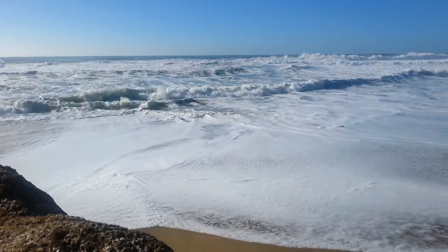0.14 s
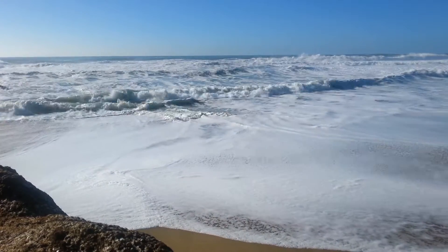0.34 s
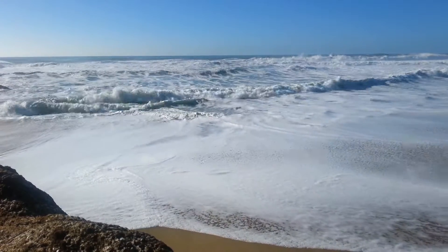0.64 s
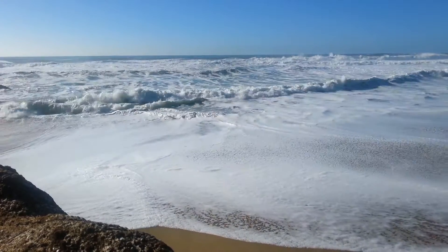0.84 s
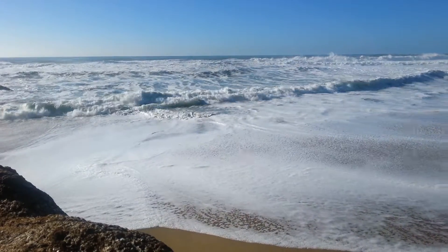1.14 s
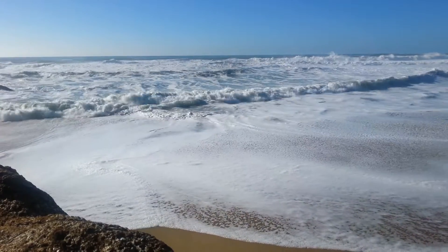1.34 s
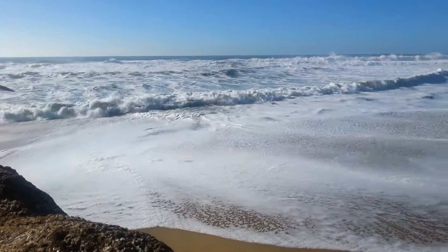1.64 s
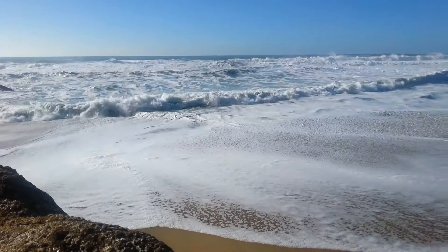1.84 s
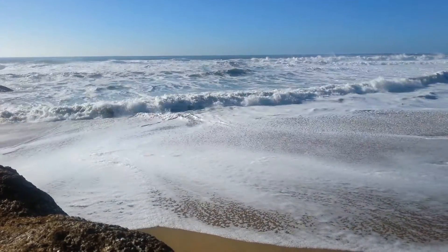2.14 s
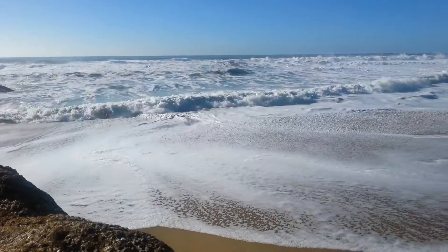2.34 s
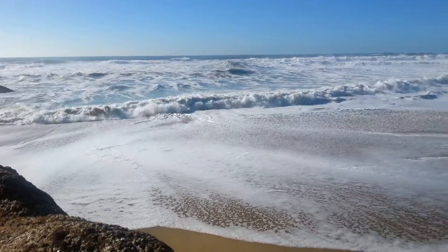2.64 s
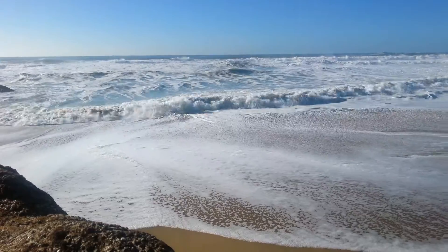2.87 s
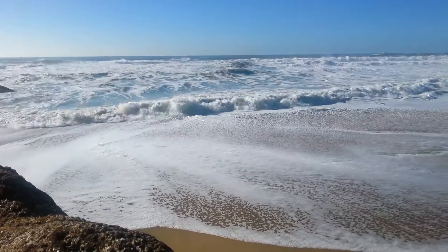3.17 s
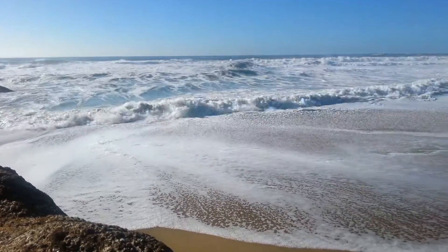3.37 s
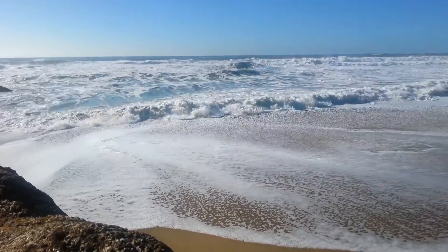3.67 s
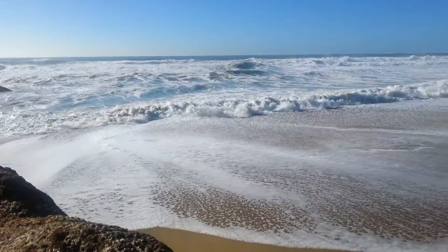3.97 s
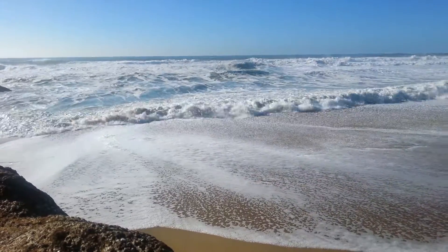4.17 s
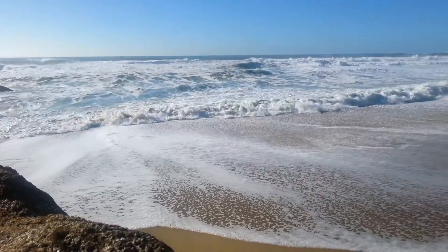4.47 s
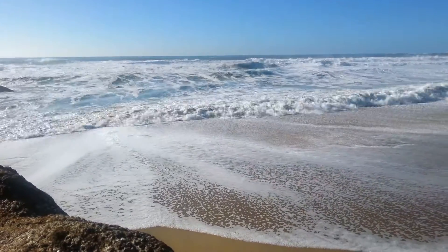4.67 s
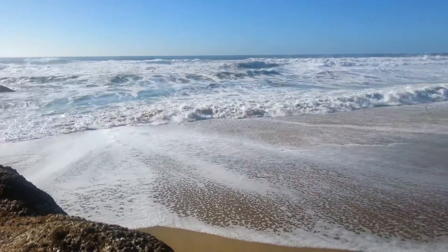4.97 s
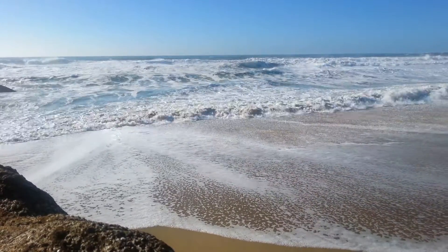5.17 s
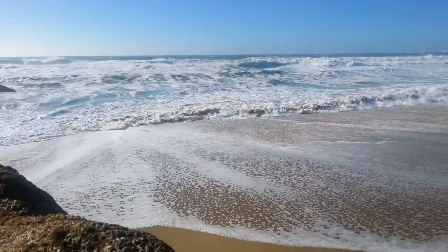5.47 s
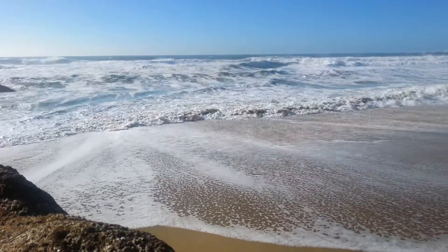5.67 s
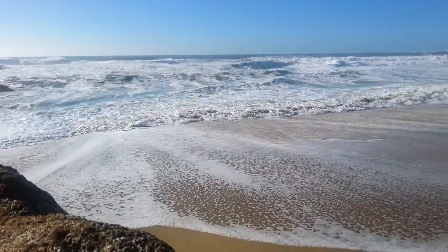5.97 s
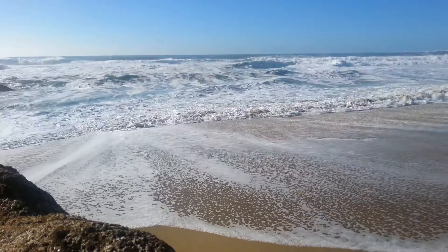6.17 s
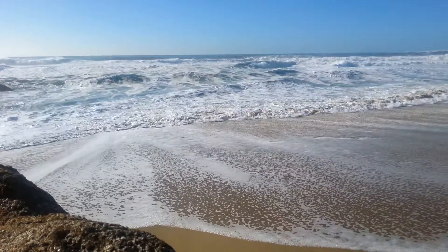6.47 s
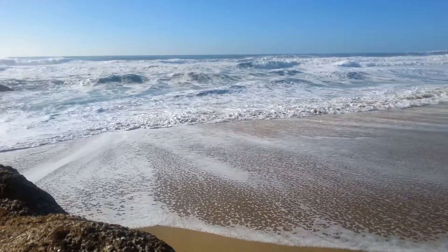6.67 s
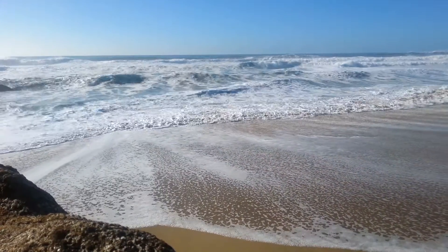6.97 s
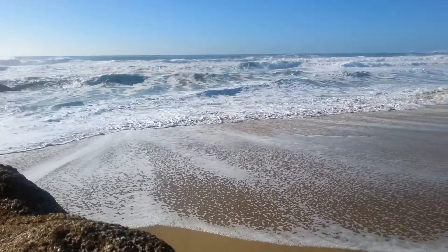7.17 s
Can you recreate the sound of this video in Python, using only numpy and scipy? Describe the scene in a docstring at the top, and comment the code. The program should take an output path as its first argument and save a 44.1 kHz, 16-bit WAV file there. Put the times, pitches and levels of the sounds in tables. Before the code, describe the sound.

On an open sandy beach, surf roars continuously over a deep far rumble, with foam hissing and fizzing up close. Hard wind gusts batter the microphone in the first second and a half, mostly on the right, with thumps and distorted knocks. The wind eases as a wave crashes a little after two seconds, then buffeting returns from about four seconds to near the end.

```python
"""Surf on a sandy beach, in wind

Far breakers rumble and boom, a bore roars in and crashes, foam hisses, seethes and fizzes on the sand:
noise and ringing bubbles, coloured and correlated as the sea is at two microphone ports.
Gusty wind, band-limited noise per port, buffets mostly the right one; the surf gets louder with each
gust and dies away more slowly. Single eddies thump and slaps of air knock one port at a time,
overloading it briefly."""
import sys
import numpy as np
from scipy import signal
from scipy.fft import rfft, irfft, next_fast_len
from scipy.io import wavfile
from scipy.ndimage import uniform_filter1d, map_coordinates

SR = 44100
rng = np.random.default_rng(int(sys.argv[2]) if len(sys.argv) > 2 else 0)


def wav_record(signal):
    """Record a signal, one row per channel, as 16-bit PCM in the file named by sys.argv[1]."""
    frames = np.transpose(np.atleast_2d(signal))
    bounded = np.clip(frames, -1, 1)
    # unit amplitude maps onto the largest positive 16-bit level
    quanta = np.round(bounded * 32767).astype(np.int16)
    wavfile.write(sys.argv[1], SR, quanta)


N = 322791
TOP_HZ = 14700  # band limit of the output and of bubble pitch

# gusts: start t/s, hold/s, buffeting left level/dB, right level/dB (both before port trims),
# level/dB added in power to the surf hiss
GUSTS = [(0.153, 0.035, -17.5, -18, -43.5), (0.308, 0.031, -22, -15, -40), (0.39, 0.074, -18, -17, -56),
         (0.582, 0.082, -28, -20, -43.5), (0.888, 0.075, -23.5, -17, -42.5), (1.028, 0.046, -26, -33, -41),
         (1.12, 0.12, -25, -15.5, -43.5), (1.296, 0.013, -18, -28, -49), (1.415, 0.055, -18, -21, -40.5),
         (2.121, 0.032, -22.5, -19, -43.5), (2.269, 0.026, -25, -23, -40.5),
         (2.343, 0.096, -24, -22.5, -47), (2.525, 0.049, -20.5, -17.5, -43.5),
         (2.918, 0.005, -27, -26, -55), (3.058, 0.061, -27, -24, -65), (3.32, 0.023, -25, -22, -72),
         (3.746, 0.1, -24, -22.5, -42.5), (3.884, 0.041, -21.5, -17.5, -46),
         (3.989, 0.025, -21, -17, -44.5), (4.109, 0.037, -24.5, -17.5, -46), (4.206, 0.11, -25, -26, -55),
         (4.376, 0.055, -24, -22.5, -44), (4.65, 0.015, -23, -20, -43), (4.719, 0.13, -22.5, -17.5, -42.5),
         (4.867, 0.019, -23, -17, -52), (4.95, 0.04, -33, -26, -49), (5.287, 0.13, -23, -21.5, -44.5),
         (5.47, 0.041, -21.5, -16, -46.5), (5.811, 0.056, -23, -26, -44), (5.863, 0.099, -27, -17.5, -47),
         (6.042, 0.05, -21.5, -18.5, -45), (6.338, 0.032, -25.5, -22, -46.5),
         (6.522, 0.017, -19.5, -21.5, -42.5)]


def amp(db):
    """Decibels to gain."""
    return 10 ** (np.asarray(db) / 20)


def unit(x):
    """Scale to rms 1."""
    return x / np.sqrt(np.mean(x ** 2) + 1e-20)


def along(rows, hz):
    """Each column after the frequency, interpolated on a log-frequency axis."""
    f, *cols = np.transpose(rows)
    return np.array([np.interp(np.log(hz + 1), np.log(f + 1), c) for c in cols])


def curves(rows):
    """One value per sample for each column after the time."""
    s, *cols = np.transpose(rows)
    return np.array([np.interp(np.arange(N) / SR, s, c) for c in cols])


def wobble(rate_hz):
    """Smooth random curve with rate_hz knots a second."""
    knots = rng.standard_normal(int(N * rate_hz / SR) + 4)
    return map_coordinates(knots, [np.arange(N) * rate_hz / SR])


def filtered(x, response):
    """x times a complex response of frequency."""
    size = next_fast_len(N + 8192)
    return irfft(rfft(x, size) * response(np.fft.rfftfreq(size, 1 / SR)), size)[..., :N]


def above(hz, edge_hz, order=4):
    """Gain of a high-pass."""
    return 1 / np.sqrt(1 + (edge_hz / (hz + 1)) ** (2 * order))


def below(hz, edge_hz, order=4):
    """Gain of a low-pass."""
    return 1 / np.sqrt(1 + (hz / edge_hz) ** (2 * order))


def steady(x, span_s=0.038):
    """Noise held near rms 1 from moment to moment; its quick grain stays."""
    size = max(int(span_s * SR), 64)
    power = uniform_filter1d(uniform_filter1d(x ** 2, size), size)
    return x / np.sqrt(abs(power) + 1e-20)


def churn(patchy_db):
    """Two unrelated noises whose shared patches of time and frequency swell and fade."""
    z = signal.stft(rng.standard_normal((2, N)), nperseg=512)[2]
    field = uniform_filter1d(rng.standard_normal(z.shape[1:]), size=6, axis=0)
    field = uniform_filter1d(field, size=14, axis=1)
    return unit(signal.istft(z * amp(patchy_db * unit(field)), nperseg=512)[1][:, :N])


def bubbles(centre_hz, cycles, spread_db, count):
    """Small bubbles ring briefly, each at its own pitch, strength and place; cycles = 1/e decay."""
    when, place, size = rng.random((count, 3)).T
    hz = np.minimum(centre_hz * np.exp(.5 * rng.standard_normal(count)), TOP_HZ)
    turns = hz[:, None] * np.arange(160) / SR
    strength = amp(-spread_db * np.log(1 - .995 * size))
    rings = strength[:, None] * np.sin(2 * np.pi * turns) * np.exp(-turns / cycles)
    index = ((when * N).astype(int)[:, None] + np.arange(turns.shape[1])).ravel()
    ports = []
    for share in (place, 1 - place):
        weighted = rings * np.sqrt(share)[:, None]
        ports.append(np.bincount(index, weighted.ravel(), N)[:N])
    return unit(np.array(ports))


def from_sea(pair, low_hz, high_hz):
    """A band of sea sound, coloured and correlated between the ports, its mid at rms 1."""
    # sea colour per port: f/Hz, left density/dB per Hz, right density/dB per Hz (relative)
    colour = [(40, -29, -25), (60, -21, -24), (135, -5.5, -2.5), (235, 1.5, 2), (270, -1.5, -0.5),
              (446, -13.5, -13), (660, -15, -15.5), (1030, -17.5, -13), (1324, -21, -21.5),
              (2070, -25, -24.5), (2350, -20.5, -26), (2970, -30.5, -31), (3720, -26, -30),
              (4700, -33.5, -29), (5250, -32, -33.5), (5500, -36.5, -37), (7200, -42, -33),
              (7840, -42, -33), (10120, -40.5, -38.5), (12200, -49.5, -70), (14100, -61, -60)]
    # likeness of the ports, each part clipped to +-0.95: f/Hz, in-phase/1, quadrature/1
    likeness = [(40, 0.18, 0.7), (123, 0.76, -0.6), (180, 0.89, -0.2), (400, 0.59, 0.091),
                (553, 0.9, -0.55), (700, 0.98, 0.24), (877, -0.35, 1), (1178, -0.1, -1.34),
                (1640, -0.22, 0.31), (2370, 0.61, 0.63), (2830, -0.62, 0.44), (2960, -0.041, -0.013),
                (5840, -0.05, 0.27), (11502, -0.034, -0.073), (14000, 0.45, 0.01)]

    def shared(hz):
        real, quadrature = np.clip(along(likeness, hz), -.95, .95)
        return real + 1j * quadrature

    def own(hz):
        return np.sqrt(np.maximum(1 - abs(shared(hz)) ** 2, 0))

    def band(hz):
        return amp(along(colour, hz)) * above(hz, low_hz) * below(hz, high_hz)

    right = filtered(pair[0], shared) + filtered(pair[1], own)
    ports = filtered(np.array([pair[0], right]), band)
    return ports / np.std(ports.mean(axis=0))


def breakers(wide_db=-28, ahead_db=-31):
    """Far breakers merge into a slowly heaving rumble; those straight ahead reach both ports alike."""
    # slow heave: t/s, level/dB (relative)
    heave = [(0, 1), (1.2, 4.5), (1.9, 2.6), (2.5, 2.5), (3.5, -1.2), (5, 1), (6.3, 0.5), (7.3, 0)]
    wide = from_sea(churn(patchy_db=0.5), low_hz=42, high_hz=606)
    ahead = unit(from_sea(churn(patchy_db=3.5), low_hz=50, high_hz=615)[0])
    return amp(curves(heave)[0]) * (amp(wide_db) * wide + amp(ahead_db) * ahead)


def bore(roar_db, trim_db=3.0):
    """The broken wave tumbles up the beach, full of large bubbles."""
    large = bubbles(centre_hz=1428, cycles=1.8, spread_db=-2.0, count=6000)
    water = churn(patchy_db=0.83) + 0.15 * large
    return amp(roar_db + trim_db) * from_sea(water, low_hz=595, high_hz=2880)


def hollows(x, spacing_hz=720, reach_hz=420):
    """A low hollow creeps up and fades by 3.3 s; another near 900 Hz then deepens; shoulders rise."""
    # hollow in the spectrum: t/s, f/Hz, depth/dB
    notch = [(0, 148, 3), (1.3, 254, 3), (2.0, 317, 4), (2.9, 385, 3), (3.3, 464, 0.4), (3.55, 845, 0.5),
             (4.3, 860, 2.5), (5.0, 865, 3.5), (6.0, 915, 4), (7.32, 930, 4.5)]
    hz, t, z = signal.stft(x, SR, nperseg=1024)
    s, notch_hz, depth_db = np.transpose(notch)
    offset_hz = hz[:, None] - np.interp(t, s, notch_hz)
    ripple = np.cos(2 * np.pi * offset_hz / spacing_hz) * np.exp(-.5 * (offset_hz / reach_hz) ** 2)
    gain = amp(-np.interp(t, s, depth_db) * ripple)
    return signal.istft(z * gain, SR, nperseg=1024)[1][:, :N]


def spread(x, start_s=3.6, length_s=2.8):
    """As the bore fans out along the beach, the widest part of its sound moves up in pitch."""
    # gain of the stereo side signal: f/Hz, bore far level/dB, bore spread out level/dB
    width = [(430, -1.5, -6), (540, 6, 5), (690, 5, 0), (880, -4, -2), (1250, -5, -0.5), (1500, 0.5, 3.5),
             (1750, 1.5, 1.5)]
    mid, side = (x[0] + x[1]) / 2, (x[0] - x[1]) / 2
    far, near = filtered(side, lambda hz: amp(along(width, hz)))
    arrived = np.clip((np.arange(N) / SR - start_s) / length_s, 0, 1)
    side = far + arrived * (near - far)
    return np.array([mid + side, mid - side])


def foam(hiss_db, pan_db):
    """Countless tiny bubbles burst on the sand; the hiss drifts to the left."""
    tiny = bubbles(centre_hz=5200, cycles=0.94, spread_db=1.0, count=12000)
    hiss = churn(patchy_db=1.0) + 0.14 * tiny
    hiss = filtered(hiss, lambda hz: below(hz, 9140, order=10))
    port_db = hiss_db + np.array([pan_db, -pan_db]) / 2
    return amp(port_db) * from_sea(hiss, low_hz=2950, high_hz=13000)


def fizz(fizz_db):
    """The smallest bubbles merge into a fine sizzle above the hiss."""
    noise = rng.standard_normal((2, N))
    sizzle = filtered(noise, lambda hz: above(hz, 11800) * below(hz, 13600, order=8))
    return amp(fizz_db) * from_sea(sizzle, low_hz=9500, high_hz=13000)


def seethe():
    """Thick near foam bursts in bubbles large enough to grain the hiss, until it drains."""
    # near foam: t/s, level/dB
    sheet = [(0, -48), (0.8, -50.5), (1.2, -47), (1.6, -50.5), (2.2, -70), (7.32, -90)]
    pops = bubbles(centre_hz=4100, cycles=2.0, spread_db=3.0, count=9000)
    return amp(curves(sheet)[0]) * from_sea(pops, low_hz=3800, high_hz=4700)


def booms():
    """A big breaker far out falls with a deep, slowly swelling boom."""
    # booms: middle t/s, Gaussian sigma/s, filter f/Hz, peak level/dB
    falls = [(0.1, 0.23, 102, -36.5), (1.17, 0.12, 75, -31.5), (2.446, 0.24, 130, -29.5),
             (5.6, 0.69, 98, -31.5), (7.1, 0.34, 85, -37.5)]
    t = np.arange(N) / SR
    total = np.zeros((2, N))
    for s, sigma_s, tune_hz, db in falls:
        noise = rng.standard_normal((2, N)) + rng.standard_normal(N)
        rumble = filtered(noise, lambda hz: above(hz, 1.2 * tune_hz) * below(hz, tune_hz))
        total += amp(db) * np.exp(-.5 * ((t - s) / sigma_s) ** 2) * unit(rumble)
    return total


def gusting(calm_db, peaks_db, release_s, attack_s=0.02):
    """Level in dB over time: at each gust it rises, holds and dies away, in power above a calm level."""
    t = np.arange(N) / SR
    power = amp(calm_db) ** 2
    for (start, hold, *_), peak_db in zip(GUSTS, peaks_db):
        rise = np.clip((t - start) / attack_s, 0, 1)
        fall = np.exp(-np.maximum(t - start - attack_s - hold, 0) / release_s)
        power = power + (amp(peak_db) * rise * fall) ** 2
    return 10 * np.log10(power)


def wind(strength_db, common, trim_db, lumpy_db, share=0.35, rasp_db=-5.0, rasp_growth=1.42):
    """Turbulence at one port: a low lumpy roar, partly common to both, harsher in strong gusts."""
    # buffeting colour: f/Hz, density/dB per Hz (relative)
    buffet = [(20, -45), (40, -34), (60, -9.5), (100, -2), (170, 4), (250, 0.5), (340, -4.5), (500, -10.5),
              (800, -32), (1500, -31), (4000, -50), (9000, -88)]
    share = np.clip(share, 0, 1)
    gust_db = strength_db + trim_db
    stir = np.sqrt(share) * common + np.sqrt(1 - share) * rng.standard_normal(N)
    roar = filtered(stir, lambda hz: amp(along(buffet, hz)[0]))
    # faster air sheds smaller eddies, so the upper band grows faster than the roar
    rasp = filtered(rng.standard_normal(N), lambda hz: above(hz, 376) * below(hz, 420, order=3))
    lumps = amp(lumpy_db * wobble(90))
    low = amp(gust_db) * steady(lumps * roar)
    high = amp(rasp_growth * gust_db + rasp_db) * steady(lumps * rasp)
    return low + high


def eddies(turbulence, sweep=0.47, bend=0.114):
    """A strong eddy sweeps small turbulence aside and shoves one port's air briefly, its pitch bending."""
    # eddies: middle t/s, envelope peak level/dB, middle f/Hz, half-width at half height/s, port (0 L, 1 R)
    shoves = [(0.157, -4.5, 237, 0.0014, 1), (0.18, 0, 257, 0.0011, 1), (0.184, -2, 310, 0.0016, 0),
              (0.187, 5.5, 208, 0.00097, 1), (0.199, -2, 329, 0.0033, 0), (0.2068, -6, 279, 0.0012, 1),
              (0.224, -2, 300.5, 0.0013, 1), (0.288, 3, 316, 0.0018, 1), (0.325, -8, 262, 0.0036, 1),
              (0.349, 1, 283, 0.0014, 1), (0.371, 0, 318.4, 0.0022, 1), (0.4045, -8, 348.5, 0.0028, 0),
              (0.426, -5, 265, 0.0013, 1), (0.462, -3, 274, 0.0013, 1), (0.471, -3.5, 407, 0.0026, 0),
              (0.487, -16, 478, 0.0015, 0), (0.615, -2, 280, 0.0023, 1), (0.905, -2.5, 309, 0.0013, 1),
              (0.925, -7, 241, 0.003, 1), (0.9445, 2, 200, 0.0041, 1), (0.965, -6, 278, 0.0011, 1),
              (0.994, -7, 358, 0.003, 0), (1.049, -2.5, 253, 0.0015, 1), (1.134, -3.5, 223.5, 0.0026, 1),
              (1.174, -5, 319, 0.0015, 1), (1.19, -4.5, 332, 0.0032, 1), (1.219, -2.5, 314, 0.0014, 1),
              (1.23, -7, 453, 0.0034, 1), (1.242, -5.5, 356, 0.006, 1), (1.26, -9, 245, 0.003, 1),
              (1.274, -5, 247, 0.0029, 1), (1.312, -9, 284, 0.003, 0), (1.441, -4, 297, 0.0022, 0),
              (1.449, -5, 259, 0.0015, 0), (1.457, -10, 506, .002, 0), (1.466, -7, 346, .003, 0),
              (1.475, -12, 469, .002, 1), (1.486, -8, 255, 0.003, 1), (2.378, -9, 168.8, 0.0088, 1),
              (2.434, -9, 277, .0028, 0), (2.574, -3, 232, 0.0023, 1), (2.592, -7, 273, 0.004, 1),
              (3.9145, -5, 370, 0.0026, 1), (3.922, -2.5, 247, 0.0035, 1), (3.946, -4, 241, .0017, 1),
              (4.011, -10, 417, 0.0025, 1), (4.027, -7, 290, 0.004, 1), (4.035, -9, 276, 0.0023, 0),
              (4.074, -6, 299, 0.0016, 1), (4.121, -3, 343, 0.0022, 1), (4.238, -10, 231, 0.0023, 0),
              (4.272, -8, 192, 0.0055, 1), (4.384, 2, 318, 0.0012, 1), (4.396, -6, 353, 0.00088, 1),
              (4.417, -2, 234, 0.0017, 0), (4.668, -4.5, 248, 0.0034, 1), (4.763, -5, 247, 0.002, 1),
              (4.828, 0, 309, 0.001, 1), (4.856, -2, 201, 0.0016, 1), (4.887, -6, 253, 0.0026, 1),
              (4.894, -5, 232, 0.0029, 0), (4.896, 3, 231, 0.0038, 1), (4.901, -6, 325, 0.0016, 1),
              (4.957, 1, 298, 0.0011, 1), (5.3, -0.5, 214, 0.0014, 1), (5.357, -3.5, 223, 0.0018, 1),
              (5.38, -9, 384, 0.0015, 1), (5.475, -8, 252, 0.002, 1), (5.497, -12, 287, 0.0027, 1),
              (5.51, -1.5, 259, 0.0037, 1), (5.523, -6, 279, 0.003, 1), (5.884, -1.5, 296.6, 0.0038, 1),
              (5.901, -6.5, 516, 0.0024, 1), (5.906, -6, 317, 0.0054, 1), (5.915, -0.5, 253, 0.0026, 1),
              (5.922, 3, 260.5, 0.002, 1), (5.97, -4, 214, 0.0016, 1), (6.065, -0.5, 267, 0.0018, 1),
              (6.083, 0, 253, 0.00079, 1), (6.366, -5.5, 241.4, .003, 1), (6.394, -4, 238, 0.0014, 1),
              (6.534, -7, 225.5, 0.0022, 1), (6.553, -5.5, 266, 0.003, 1), (6.594, -4.5, 212, 0.003, 0)]
    ports, calm = np.zeros((2, N)), np.ones((2, N))
    t = np.arange(-1200, 1200) / SR
    draws = rng.random((len(shoves), 2))
    for (s, db, hz, width_s, port), (turn, glide) in zip(shoves, draws):
        swell = .5 ** (abs(t / width_s) ** 1.5)
        pitch_hz = hz * (1 + bend * (2 * glide - 1) * np.tanh(t / width_s))
        tone = np.sin(2 * np.pi * (np.cumsum(pitch_hz) / SR + turn))
        first = round(s * SR) - len(t) // 2
        ports[round(port), first:][:len(t)] += amp(db) * swell * tone
        calm[round(port), first:][:len(t)] *= 1 - np.clip(sweep, 0, 1) * swell
    return calm * turbulence + filtered(ports, lambda hz: above(hz, 64))


def slaps(turbulence, sweep=0.74, rebound=0.4, rebound_length=2.9, point=1.4):
    """Air hits a port head-on: a pointed push, slower rebound either side, turbulence swept aside."""
    # slaps: middle t/s, level/dB (before push shape and factor 2), push 1/e half-width/s, port (0 L, 1 R)
    hits = [(0.2075, 2.5, 0.0003, 0), (0.2882, -10, 0.00066, 1), (0.4708, -8, 0.00041, 0),
            (1.142, -8, 0.00045, 1), (1.1655, 1.5, 0.00061, 1), (1.228, -6, 0.00043, 1),
            (4.1534, -4, 0.00051, 1), (4.8927, 0, 0.00055, 1), (4.8955, -2, 0.00057, 1),
            (5.3669, -0.5, 0.00063, 1), (5.9109, -13, 0.00043, 1)]
    ports, calm = np.zeros((2, N)), np.ones((2, N))
    t = np.arange(-400, 400) / SR
    for s, db, width_s, port in hits:
        first = round(s * SR) - len(t) // 2
        push = np.exp(-abs(t / width_s) ** point)
        wake = np.exp(-abs(t / (rebound_length * width_s)) ** 2)
        ports[round(port), first:][:len(t)] += amp(db) * 2 * (push - rebound * wake)
        calm[round(port), first:][:len(t)] *= 1 - np.clip(sweep, 0, 1) * wake
    return calm * turbulence + filtered(ports, lambda hz: above(hz, 120))


def crash(attack_s=0.086, release_s=0.17, drops=0.43):
    """The bore collapsing on the sand throws up a smooth surge of spray and drops."""
    # collapses: start t/s, release start after it/s, peak level/dB, low edge f/Hz, high edge f/Hz
    collapses = [(0.9, 0.63, -36.5, 690, 1040), (2.218, 0.41, -36, 417, 5500)]
    total = np.zeros((2, N))
    for start, hold, db, low_hz, high_hz in collapses:
        t = np.arange(N) / SR - start
        swell = np.clip(t / attack_s, 0, 1) * np.exp(-np.maximum(t - hold, 0) / release_s)
        rings = bubbles(centre_hz=2110, cycles=2.7, spread_db=3.0, count=5000)
        spray = churn(patchy_db=1.0) + drops * rings
        total += amp(db) * swell * from_sea(spray, low_hz=low_hz, high_hz=high_hz)
    return total


def scene(left_shelter_db=-3.5, flutter_db=0.35, left_edge_hz=85):
    """Sea in front, wind on each port, thinner on the sheltered left; surf gets louder with each gust."""
    # surf hiss between gusts: t/s, level/dB
    surf = [(0, -43.5), (1.4, -44), (2.05, -42), (2.5, -41.5), (3, -43.5), (5, -45), (7.32, -47)]
    # wash balance: t/s, roar re hiss level/dB (before bore trim), fizz re hiss level/dB, hiss L-R gain/dB
    wash = [(0, 6.5, -18, -0.8), (0.6, 6, -19.5, 1), (1.2, 4.5, -18, 1), (1.8, 7, -18.5, 0),
            (2.4, 6, -16, 1.5), (2.8, 7, -15.5, 0.5), (3.4, 8, -18.5, 1.5), (3.75, 8, -19, 0.5),
            (4.3, 8, -21, 2), (4.8, 8.5, -21, 1.5), (5.6, 8, -23, 3), (6.4, 8.5, -22.5, 2.5),
            (7.3, 8, -19, 3.5)]
    # breeze between gusts: t/s, level/dB (before shelter and port trims)
    breeze = [(0, -27.5), (1.8, -36), (3.6, -28.5), (4.2, -25), (5.3, -25.5), (6.6, -26), (7.32, -30)]
    buffet_release_s, hiss_release_s = 0.077, 0.2  # the surf dies away more slowly
    _, _, left_db, right_db, louder_db = np.transpose(GUSTS)

    hiss_db = gusting(curves(surf)[0], louder_db, hiss_release_s) + flutter_db * wobble(22)
    roar_db, fizz_db, pan_db = curves(wash)
    sea = spread(hollows(breakers() + bore(hiss_db + roar_db)))
    sea = sea + foam(hiss_db, pan_db) + fizz(hiss_db + fizz_db)

    breeze_db = curves(breeze)[0]
    common = rng.standard_normal(N)
    left_gust_db = gusting(breeze_db + left_shelter_db, left_db, buffet_release_s)
    left = wind(left_gust_db, common, trim_db=1.8, lumpy_db=1.6)
    left = filtered(left, lambda hz: above(hz, left_edge_hz, order=1))
    right_gust_db = gusting(breeze_db, right_db, buffet_release_s)
    right = wind(right_gust_db, common, trim_db=1.0, lumpy_db=2.5)
    air = slaps(eddies(np.array([left, right])))
    return sea + seethe() + booms() + air + crash()


def record(dry):
    """The recorder cuts the deepest rumble, saturates near full scale and drops all above TOP_HZ."""
    lean = filtered(dry, lambda hz: above(hz, 47, order=5))
    squashed = lean / (1 + abs(lean) ** 16) ** (1 / 16)
    return filtered(squashed, lambda hz: hz < TOP_HZ)


dry = scene()
out = record(dry)
wav_record(out)
```